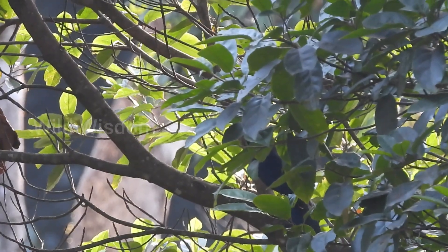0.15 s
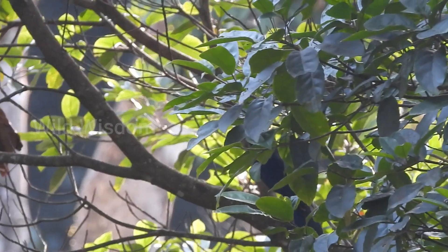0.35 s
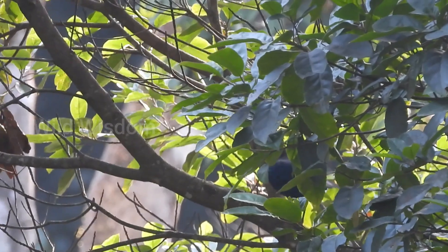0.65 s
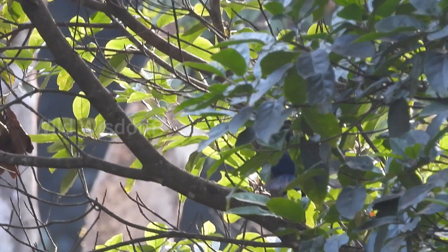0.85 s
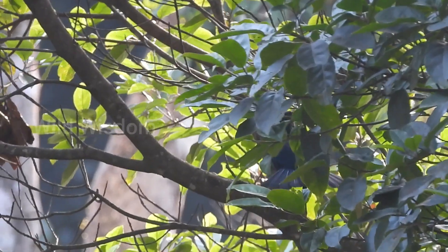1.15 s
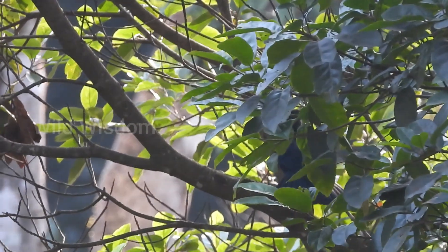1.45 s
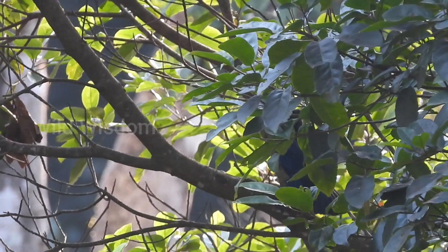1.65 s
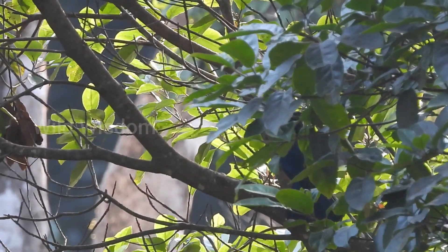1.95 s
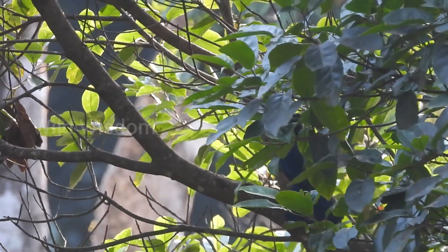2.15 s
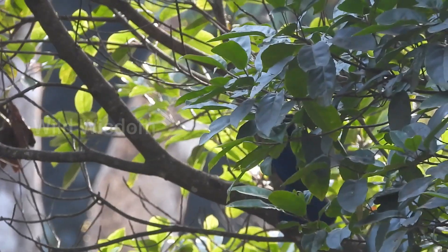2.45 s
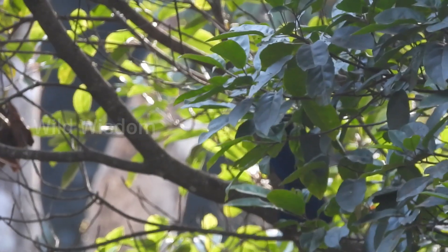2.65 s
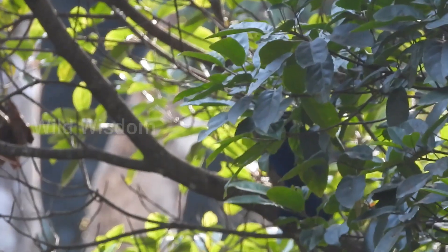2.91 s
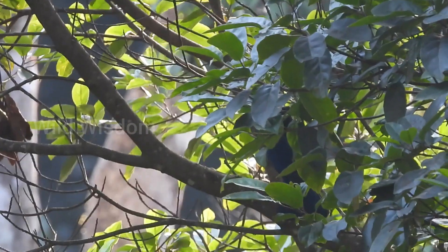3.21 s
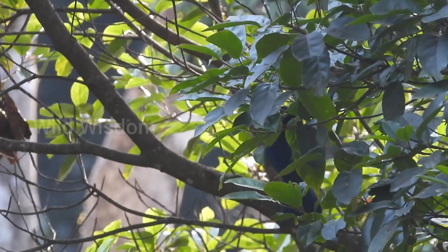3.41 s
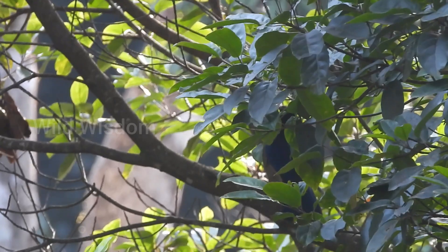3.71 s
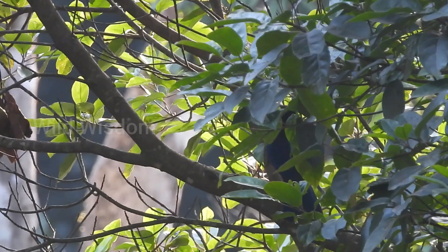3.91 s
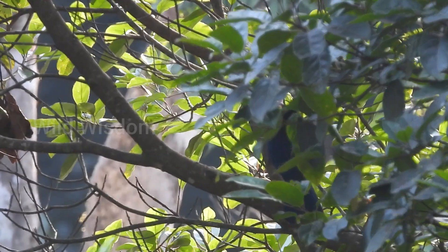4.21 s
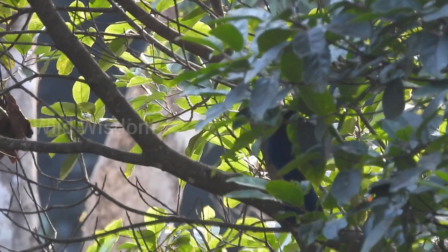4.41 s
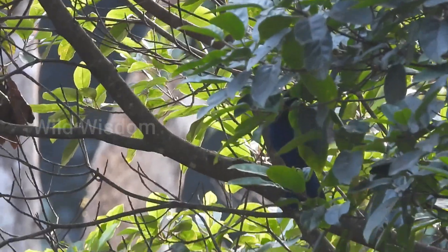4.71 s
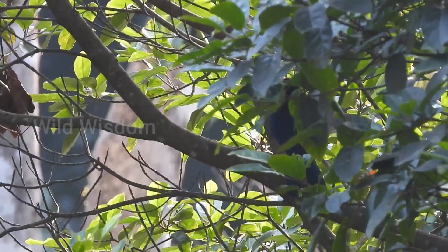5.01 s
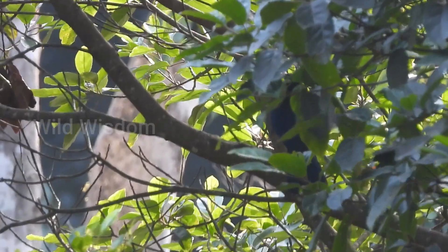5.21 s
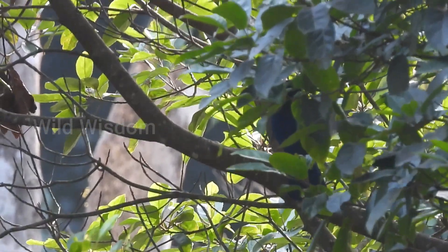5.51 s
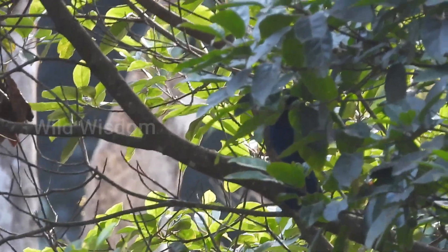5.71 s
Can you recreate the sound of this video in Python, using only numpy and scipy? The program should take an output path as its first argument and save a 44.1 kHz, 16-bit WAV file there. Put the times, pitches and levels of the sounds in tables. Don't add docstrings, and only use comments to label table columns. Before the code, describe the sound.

Two piercing bird screams ring through an echoing forest, with sharp chips, rising whistles and a thin tone over insect hiss and plopping water.

```python
import sys
import numpy as np
from scipy import signal
from scipy.fft import rfft, irfft, next_fast_len
from scipy.io import wavfile
from scipy.ndimage import uniform_filter1d

SR = 44100
rng = np.random.default_rng(int(sys.argv[2]) if len(sys.argv) > 2 else 0)


def unload_audio(sound):
    columns = np.transpose(np.atleast_2d(sound))
    steps = np.round(np.clip(columns, -1, 1) * 32767)
    wavfile.write(sys.argv[1], SR, steps.astype(np.int16))


def volts_from_decibels(level):
    exponent = np.asarray(level, float) / 20
    return 10 ** exponent


N = 258426

# pitch in Hz, level in dB per Hz.
AIR_COLOUR = [(25, -34), (80, -38.5), (200, 0), (260, -7.5), (630, -21.5), (830, -11.5), (1400, -6),
              (2200, -7.5), (4900, -7.5), (6900, -14.5), (8500, -27.5), (11000, -29.5), (13500, -37),
              (16500, -56)]
# pitch in Hz, level in dB per Hz.
STREAM_COLOUR = [(59, -58), (100, -28), (221, -9), (266, -3.5), (464, -2), (541, -4), (783, 1.5),
                 (995, -3.5), (1350, -9.5), (1760, -24), (2970, -120)]
# time in seconds, level in dB.
STREAM_SURGES = [(0.0, -59), (0.19, -58), (0.49, -48), (0.6, -57), (1.14, -52.5), (1.63, -53),
                 (1.73, -61.5), (2.27, -57), (2.58, -61.5), (2.95, -50.5), (3.26, -59), (3.59, -49.5),
                 (3.9, -59.5), (3.95, -52), (4.29, -57.5), (4.39, -54.5), (4.41, -57), (5.86, -59)]
# pitch in Hz, level in dB per Hz.
LEAF_COLOUR = [(6500, -1.5), (8500, -5.5), (11000, -18.5), (13500, -27.5), (16000, -34)]
# pitch in Hz, level in dB per Hz.
INSECT_COLOUR = [(4300, -10.5), (5200, -11), (5800, -1.5), (6150, 1.5), (6600, -9.5), (7300, -23.0)]
# pitch in Hz, likeness from -1 to 1.
LIKENESS = [(60, 0.16), (180, 0.6), (550, 0.63), (1650, 0.68), (4970, 0.082), (15000, -0.77)]
# pitch in Hz, time to fall by 60 dB in seconds.
FOREST_T60 = [(1000, 2.2), (2500, 1.1), (4600, 1.47), (7600, 1.5), (12000, .9), (16000, .9)]
# start in seconds, peak level in dB, pitch in Hz.
PLOPS = [(0.419, -50, 782), (0.718, -47, 576), (0.97, -67, 820), (1.073, -36.5, 633), (1.223, -40.5, 840),
         (1.406, -43, 620), (1.474, -43.5, 620), (1.671, -39, 635), (1.938, -47.5, 754),
         (2.238, -40.5, 650), (2.371, -44, 828.6), (2.638, -46.5, 586), (2.972, -39.5, 740),
         (3.106, -41, 872), (3.31, -42.5, 781), (3.539, -37, 640), (3.674, -42.5, 612), (4.01, -45, 659),
         (4.474, -43, 773), (4.942, -40, 623), (5.154, -51, 780), (5.524, -47, 834)]
# start in seconds, length in seconds, level in dB, centre in Hz.
RUSTLES = [
    (.330, .018, -39, 6300),
    (.347, .016, -40, 5800),
    (3.96, .09, -68, 7500),
    (4.15, .08, -65, 7000),
    (4.31, .1, -63, 8000),
]
# start in seconds, length in seconds, start pitch in Hz, level in dB, octave in dB.
COOS = [
    (4.17, .1, 228, -72, 8),
    (4.33, .075, 222, -54, -3),
]
# start in seconds, length in seconds, top pitch in Hz, level in dB.
HIGH_CHIPS = [
    (.097, 0.028, 8070, -36),
    (.129, 0.011, 7690, -29),
    (1.03, 0.022, 8230, -36.5),
    (1.06, 0.02, 7730, -34),
    (1.94, 0.0293, 7790, -33),
    (1.969, 0.041, 7630, -36.5),
]
# start in seconds, length in seconds, top pitch in Hz, level in dB.
LOW_CHIPS = [
    (.076, 0.03, 4754, -42),
    (.723, 0.012, 4840, -32.5),
    (1.199, 0.028, 4670, -40.5),
    (2.748, 0.016, 4800, -37),
    (3.165, 0.011, 4660, -39.5),
    (3.825, 0.01, 4720, -38),
    (4.458, 0.016, 4645, -41),
    (4.968, 0.01, 4720, -37.5),
]
# multiple of the pitch, level in dB.
HIGH_CHIP_LINES = [(1, 4), (1.5, -31), (2, -42)]
LOW_CHIP_LINES = [(0.96, 0.11)]
# start in seconds, length in seconds, level in dB.
THIN_SWELLS = [(0.594, 0.11, -50), (0.762, 0.088, -43), (0.855, 0.068, -38.5), (0.923, 0.098, -47),
               (1.04, 0.053, -66), (1.11, 0.091, -42), (1.223, 0.069, -28.5), (1.279, 0.066, -29.5),
               (1.329, 0.1, -34.5), (1.425, 0.06, -46.5), (1.465, 0.13, -41.5)]
# start in seconds, length in seconds, start Hz, end Hz, level in dB.
THIN_PEEPS = [
    (0.33, 0.088, 1604, 1480, -43.5),
    (.45, 0.067, 1445, 1448, -38.5),
    (2.105, 0.034, 1510, 1480, -48),
    (2.165, 0.095, 1540, 1415, -54),
    (2.30, .075, 1570, 1476, -57.5),
    (2.511, .035, 1480, 1500, -52.5),
    (4.82, 0.23, 1507, 1428, -60),
]
# start in seconds, length in seconds, top Hz, level in dB, bend (over 1 rises late).
UPSWEEPS = [
    (.885, .105, 4080, -40.5, 1.25),
    (1.09, .088, 3700, -38, 1.05),
    (1.293, .1, 3920, -37, 1.2),
    (1.508, .085, 3550, -34, .85),
]
# start in seconds, length in seconds, top pitch in Hz, level in dB.
ANSWERS = [
    (0.924, .045, 2050, -59),
    (1.153, 0.042, 2304, -47.5),
    (1.362, .065, 2370, -54.5),
    (1.576, 0.035, 2350, -57.5),
]
# start within it in seconds, length in seconds, start Hz, end Hz, level in dB.
PHRASE = [
    (0.0, .062, 1470, 2010, -49),
    (.055, .05, 1740, 2000, -51),
    (.085, .06, 1990, 2740, -43),
]
# start in seconds, change of level in dB.
PHRASE_TIMES = [
    (3.600, 0.0),
    (3.871, -2),
]
# start in seconds, length in seconds, start Hz, end
# Hz, level in dB.
GLIDING_NOTES = [(.096, .05, 1440, 1320, -58.5), (1.585, .03, 3400, 4300, -62), (1.63, .06, 2320, 2318, -53),
                 (3.302, .022, 2510, 3080, -45.5), (3.318, .045, 2050, 2570, -43.5),
                 (3.36, .18, 2400, 2520, -51.5), (3.501, .027, 2676, 2906, -35.5),
                 (3.523, .12, 2780, 2687, -46), (3.590, .04, 2050, 2640, -47), (4.202, .052, 1365, 1413, -57),
                 (4.281, .043, 1320, 1290, -56)]
# multiple of upper voice, multiple of lower voice, level in dB.
SCREAM_LINES = [(1, 0, -0.98), (2, 0, -42.5), (0, 1, -13), (0, 2, -0.5), (0, 3, -14), (0, 4, -22),
                (0, 5, -39.5), (0, 6, -41), (0, 7, -41), (0, 8, -48), (0, 9, -51), (1, 1, -8.5),
                (1, -1, -9.5), (1, 2, -31.5), (2, 1, -46.5)]
# time in seconds, upper voice in dB, lower voice in dB.
SCREAM_EFFORT = [
    [(.240, -50, -56), (.256, -39, -41), (.30, -34.5, -38.5), (.36, -31, -35), (.39, -30, -40.5),
     (.43, -22.5, -45.5), (.48, -22.5, -50), (.525, -26, -48.5), (.555, -49.5, -64)],
    [(2.708, -49, -43), (2.722, -45.5, -56), (2.76, -31.5, -52), (2.80, -35.5, -42.5), (2.83, -31, -33.5),
     (2.864, -21.5, -40), (2.89, -28.5, -56), (2.96, -26.5, -57), (3.01, -57, -77)],
]
# top Hz, climb in seconds, time sinking begins in seconds,
# length of sinking in seconds, end Hz.
UPPER_VOICE = [
    (5043, .03, .38, .15, 4420),
    (5005, .018, 2.855, .1, 4560),
]
LOWER_VOICE = [
    (1815, .008, .32, .17, 1590),
    (1830, .015, 2.815, .16, 1600),
]
DIFFERENCE_DB = [-11.5, -4.5]


def rms_one(x):
    return x / np.sqrt(np.mean(x ** 2) + 1e-20)


def at_hz(points, hz):
    table_hz, values = np.transpose(points)
    return np.interp(np.log(hz), np.log(table_hz), values)


def drift(rate):
    r = np.exp(-40 * np.pi * rate / SR)
    steps = rng.standard_normal(N // 20 + 2002)
    slow = signal.lfilter([1], [1, -2 * r, r * r], steps)[2000:]
    return np.interp(np.arange(N) / 20, np.arange(len(slow)), rms_one(slow))


def curve(rows):
    t = np.arange(N) / SR
    s, *columns = np.transpose(rows)
    gate = np.clip(np.minimum(t - s[0], s[-1] - t) / .008, 0, 1)
    return [np.interp(t, s, column) for column in columns] + [gate]


def add(out, s, piece):
    i = round(s * SR)
    out[i:i + len(piece)] += piece[:N - i]


def tone(hz):
    return 2 * np.pi * np.cumsum(hz) / SR


def noise_bands(length, per_band, low_hz, high_hz, alike_at):
    white = rfft(rng.standard_normal((2, length)))
    octave = np.log2(np.maximum(np.fft.rfftfreq(length, 1 / SR), 1))
    out = 0
    for hz in low_hz * 2 ** np.arange(0, np.log2(high_hz / low_hz), .5):
        band = np.clip(1 - 2 * abs(octave - np.log2(hz)), 0, 1)
        mid, side = irfft(white * band, length)
        alike = np.clip(alike_at(hz), 0, 1)
        stereo = np.sqrt(1 + alike) * mid + np.sqrt(1 - alike) * side * [[1], [-1]]
        out = out + per_band(hz) * stereo
    return out


def coloured(spectrum, patchy_db, patch_rate):
    size = next_fast_len(N)
    t = np.minimum(np.arange(size), N - 1)

    def flicker(hz):
        return volts_from_decibels(patchy_db * drift(patch_rate)[t])

    bands = noise_bands(size, flicker, spectrum[0][0], spectrum[-1][0], lambda hz: at_hz(LIKENESS, hz))
    colour = volts_from_decibels(at_hz(spectrum, np.fft.rfftfreq(size, 1 / SR) + 1))
    return rms_one(irfft(rfft(bands) * colour, size)[:, :N])


def forest(x, pan_db, wet_db, early_db, early_s, alike):
    t = np.arange(2 ** 16) / SR

    def fading(hz):
        tail = volts_from_decibels(0.32 * np.log2(hz / 4600) - 60 * t / at_hz(FOREST_T60, hz))
        return tail * (1 + volts_from_decibels(early_db) * np.exp(-(t / early_s) ** 2))

    echoes = noise_bands(len(t), fading, 440, 19000, lambda hz: alike) * np.clip(t / 0.0057, 0, 1)
    echoes = volts_from_decibels(wet_db) * echoes / np.sqrt(np.mean(np.sum(echoes ** 2, axis=1)))
    direct = x * volts_from_decibels(pan_db * np.array([[.5], [-.5]]))
    return direct + signal.fftconvolve(x[None], echoes, axes=1)[:, :N]


def still_air():
    return volts_from_decibels(-54) * coloured(AIR_COLOUR, patchy_db=2.5, patch_rate=6.8)


def stream_murmur():
    surge_db = curve(STREAM_SURGES)[0]
    return volts_from_decibels(surge_db + 0.5) * coloured(STREAM_COLOUR, patchy_db=3.0, patch_rate=20)


def plops():
    out = np.zeros(N)
    t = np.arange(round(.06 * SR)) / SR
    for s, db, hz in PLOPS:
        ring = np.clip(t / 0.0035, 0, 1) * np.exp(-t / 0.0096)
        add(out, s, volts_from_decibels(db) * ring * np.sin(tone(hz * (1 + 0.88 * t))))
    return out


def insects():
    size = next_fast_len(N)
    white = rng.standard_normal((3, N))
    hz = np.fft.rfftfreq(size, 1 / SR) + 1
    colour = volts_from_decibels(at_hz(INSECT_COLOUR, hz)) * (hz > 4000) * (hz < 7800)
    shared = 0.11 * white[2]
    hiss = irfft(rfft(white[:2] + shared, size) * colour, size)[:, :N]
    return volts_from_decibels(-50.5 + 0.79 * drift(28)) * rms_one(hiss)


def loudness_db(birds):
    knee_db, hold_s = -47, 0.1
    power = uniform_filter1d(np.mean(birds ** 2, axis=0), size=round(hold_s * SR))
    return 10 * np.log10(1 + np.maximum(power, 0) / volts_from_decibels(2 * knee_db))


def leaf_hiss(loud_db):
    return volts_from_decibels(-73.5 + 0.8 * loud_db) * coloured(LEAF_COLOUR, patchy_db=0.5, patch_rate=12)


def rustles():
    out = np.zeros((2, N))
    for s, length, db, hz in RUSTLES:
        size = round(length * SR)
        crackle = volts_from_decibels(4 * rng.standard_normal(4410)[:size])
        grains = rng.standard_normal((3, 4410))[:, :size] * crackle
        sos = signal.butter(3, [hz * .55, hz * 1.35], "band", fs=SR, output="sos")
        band = signal.sosfilt(sos, grains)
        for side in range(2):
            add(out[side], s, volts_from_decibels(db) * np.hanning(size) * rms_one(band[side] + band[2]))
    return out


def coo():
    out = np.zeros(N)
    for s, length, hz, db, octave_db in COOS:
        u = np.linspace(0, 1, round(length * SR))
        phase = tone(hz * (1 + 0.085 * u))
        voice = np.sin(phase) + volts_from_decibels(octave_db) * np.sin(2 * phase)
        add(out, s, volts_from_decibels(db + 9) * np.sin(np.pi * u) * voice)
    return out


def chips(table, lines, arch, sag, throb_hz, throb, warble):
    out = np.zeros(N)
    turns = rng.uniform(.85, 1.15, len(table))
    for (s, length, top_hz, db), turn in zip(table, turns):
        u = np.linspace(0, 1, round(length * SR))
        beat = np.cos(2 * np.pi * throb_hz * turn * length * u)
        phase = tone(top_hz * (1 - arch * np.exp(-u / 0.082) - sag * u - warble * (1 + beat)))
        level = np.sin(np.pi * u ** .6) ** 1.2 * (1 - throb * beat)
        voice = sum(volts_from_decibels(line_db) * np.sin(k * phase) for k, line_db in lines)
        add(out, s, volts_from_decibels(db) * level * voice)
    return out


def swell(length, db):
    edge_s, fade_db = .025, -3
    u = np.linspace(0, 1, round(length * SR))
    edge = np.clip(np.minimum(u, 1 - u) * length / edge_s, 0, 1)
    return np.sqrt(2) * volts_from_decibels(db + fade_db * u) * np.sin(np.pi / 2 * edge) ** 2


def thin_tone():
    start_s, end_s, bed_db = .6, 1.62, -50
    start_hz, rest_hz, settle_s = 1672, 1459, .33
    flutter = volts_from_decibels(2.0 * drift(40))
    level, peeps = np.zeros(N), np.zeros(N)
    for s, length, db in THIN_SWELLS:
        add(level, s, swell(length, db))
    add(level, start_s, swell(end_s - start_s, bed_db))
    for s, length, from_hz, to_hz, db in THIN_PEEPS:
        shape = swell(length, db)
        add(peeps, s, shape * np.sin(tone(np.linspace(from_hz, to_hz, len(shape)))))
    after = np.maximum(np.arange(N) / SR - start_s, 0)
    hz = rest_hz + (start_hz - rest_hz) * np.exp(-after / settle_s)
    return flutter * (peeps + level * np.sin(tone(hz)))


def whistlers():
    upsweep_start_hz, answer_start_hz = 2325, 1620
    answer_bend, phrase_bend, gliding_bend = 1.0, .8, 0.6
    glides = [(s, length, upsweep_start_hz, hz, db, bend) for s, length, hz, db, bend in UPSWEEPS]
    glides += [(s, length, answer_start_hz, hz, db, answer_bend) for s, length, hz, db in ANSWERS]
    for s, phrase_db in PHRASE_TIMES:
        for after, length, start_hz, end_hz, db in PHRASE:
            glides.append((s + after, length, start_hz, end_hz, db + phrase_db, phrase_bend))
    glides += [(*note, gliding_bend) for note in GLIDING_NOTES]
    out = np.zeros(N)
    for s, length, start_hz, end_hz, db, bend in glides:
        u = np.linspace(0, 1, round(length * SR))
        level = np.sin(np.pi * u ** (.4 + 1.1 * bend)) ** 1.15
        hz = start_hz + (end_hz - start_hz) * u ** bend
        add(out, s, volts_from_decibels(db + 4.5) * level * np.sin(tone(hz)))
    return out * volts_from_decibels(3.8 * drift(67))


def voice_pitch(t, start_hz, top_hz, climb_s, break_s, sink_s, end_hz):
    held = top_hz - (top_hz - start_hz) * np.exp(-(t - t[0]) / climb_s)
    return held, held - (top_hz - end_hz) * np.clip((t - break_s) / sink_s, 0, 1)


def thrush():
    out = np.zeros(N)
    for rows, upper_row, lower_row, start_db in zip(SCREAM_EFFORT, UPPER_VOICE, LOWER_VOICE, DIFFERENCE_DB):
        span = slice(round(rows[0][0] * SR), round(rows[-1][0] * SR))
        upper_db, lower_db, gate = [c[span] for c in curve(rows)]
        t = np.arange(N)[span] / SR
        _, upper_hz = voice_pitch(t, 4200, *upper_row)
        held_hz, lower_hz = voice_pitch(t, 1755, *lower_row)
        top_hz = held_hz + .14 * (lower_hz - held_hz)
        difference_db = start_db + np.linspace(0, -9.5, len(t))
        wobble = 1 + 0.0039 * drift(90)[span]
        upper = tone(upper_hz * (1 + 0.0057 * drift(97)[span]))
        lower, held = tone(lower_hz * wobble), tone(top_hz * wobble)
        upper_db = upper_db + 3.9 * drift(63)[span]
        lower_db = lower_db + 2.8 * drift(25)[span]
        for m, n, db in SCREAM_LINES:
            driven = m > 0 or n > 4
            stays = n > 6
            level_db = (upper_db * driven + lower_db * (n != 0)) / (driven + (n != 0))
            if n < 0:
                level_db = level_db + difference_db
            if m == 0 and n == 1:
                level_db = level_db + 0.048 * (1800 - lower_hz)
            if stays:
                level_db = upper_db - 13.5
            phase = m * upper + n * (held if stays else lower)
            out[span] += gate * volts_from_decibels(db + level_db) * np.sqrt(2) * np.sin(phase)
    return out


def scene():
    high = chips(HIGH_CHIPS, HIGH_CHIP_LINES, arch=.15, sag=.03, throb_hz=190, throb=.7, warble=.03)
    low = chips(LOW_CHIPS, LOW_CHIP_LINES, arch=0.066, sag=0.065, throb_hz=138.0, throb=1.0, warble=0.033)
    birds = forest(high, pan_db=4.5, wet_db=0, early_db=7, early_s=0.065, alike=0.088)
    birds += forest(low, pan_db=.5, wet_db=5.5, early_db=-2.0, early_s=0.057, alike=0.47)
    birds += forest(thin_tone(), pan_db=-1.4, wet_db=-11, early_db=12, early_s=.04, alike=.2)
    birds += forest(whistlers(), pan_db=-.8, wet_db=-3.8, early_db=-1, early_s=.07, alike=.5)
    birds += forest(thrush(), pan_db=-1.0, wet_db=1.0, early_db=0.0, early_s=0.034, alike=0.26)
    loud_db = loudness_db(birds)
    background = still_air() + stream_murmur() + plops() + leaf_hiss(loud_db)
    background += volts_from_decibels(.1 * loud_db) * insects()
    return background + rustles() + coo() + birds


def band_limit(x):
    return signal.sosfilt(signal.butter(12, 16670, fs=SR, output="sos"), x)


def record(dry):
    return band_limit(dry)


dry = scene()
out = record(dry)
unload_audio(out)
```